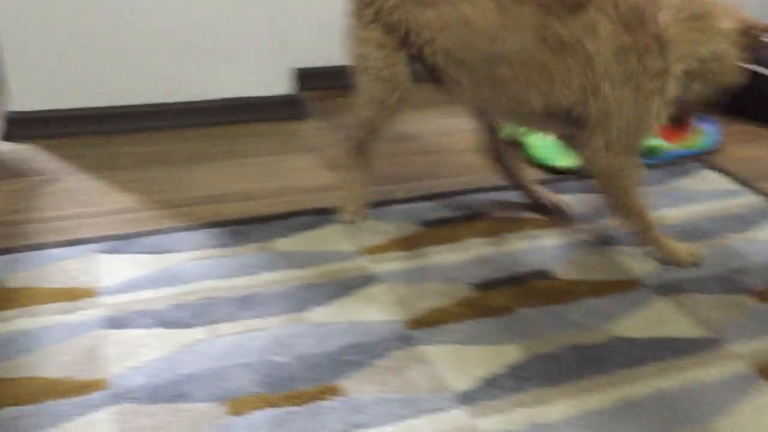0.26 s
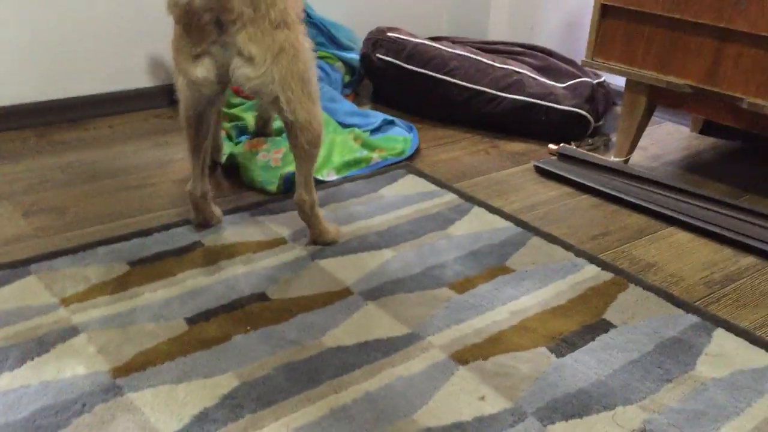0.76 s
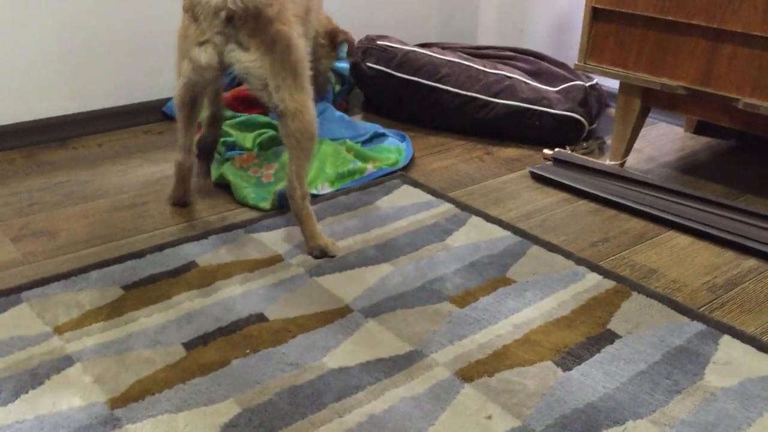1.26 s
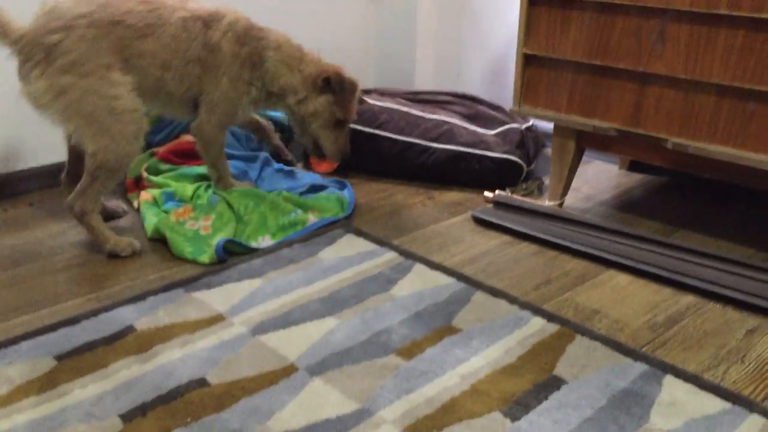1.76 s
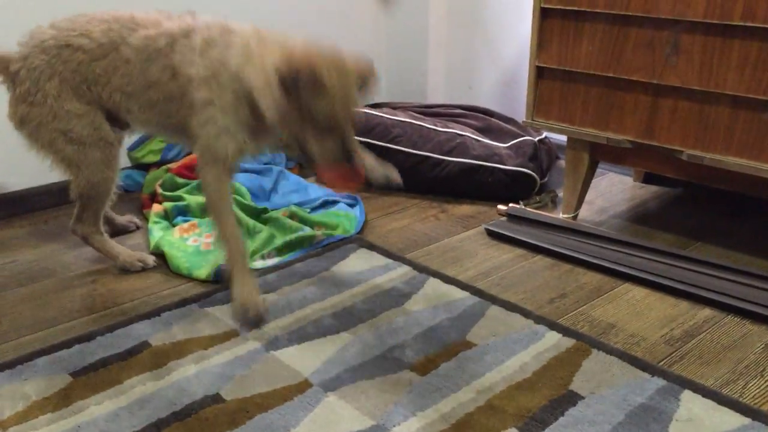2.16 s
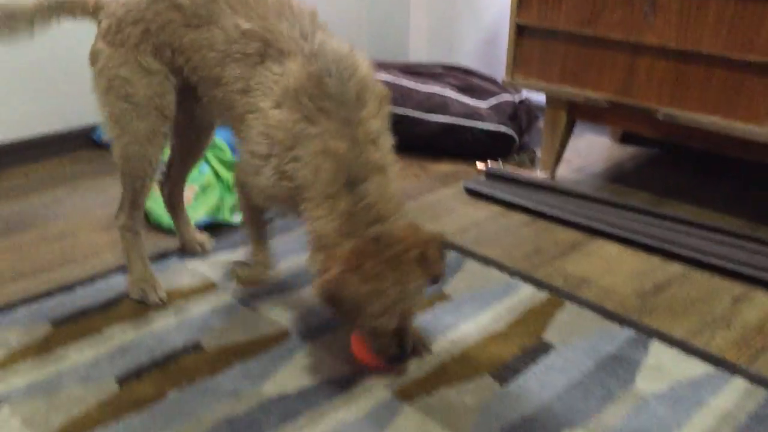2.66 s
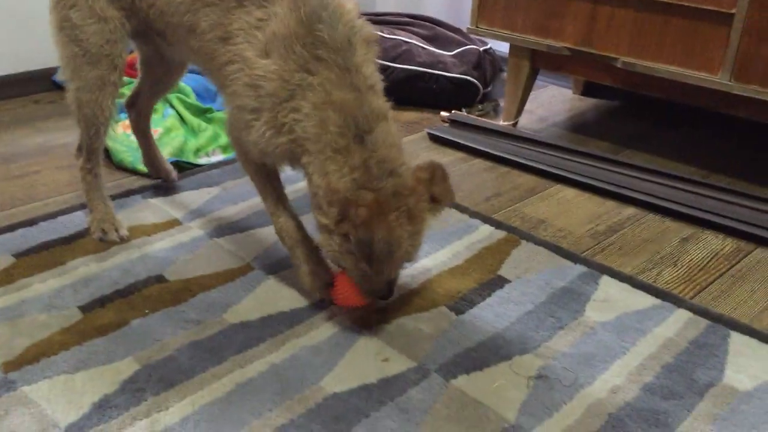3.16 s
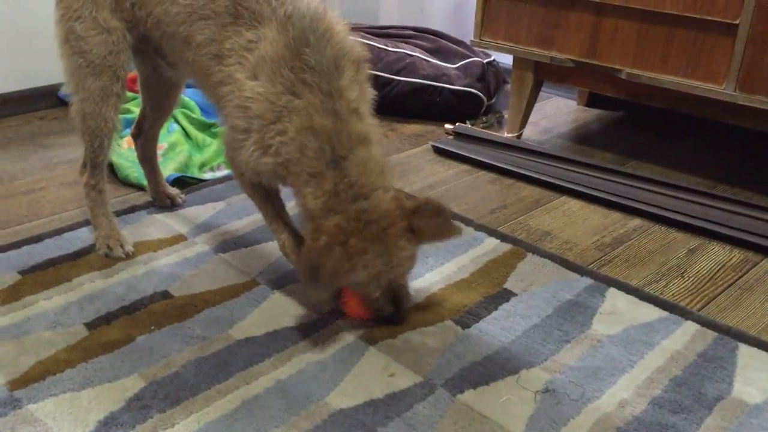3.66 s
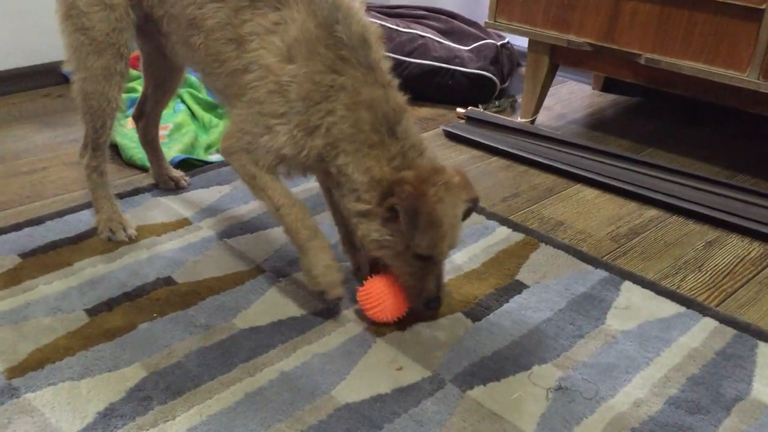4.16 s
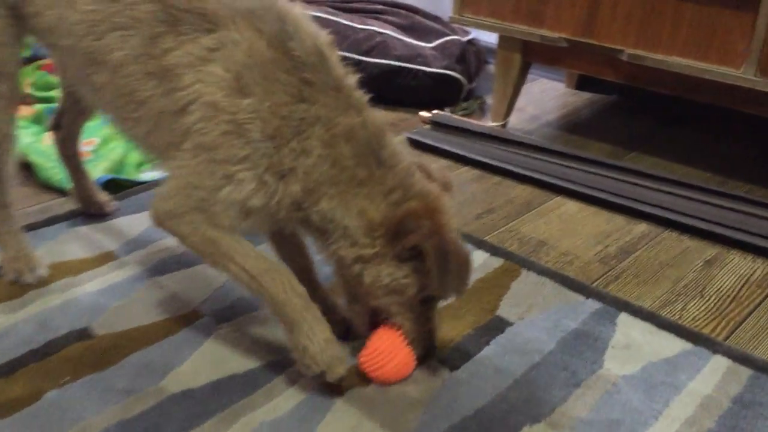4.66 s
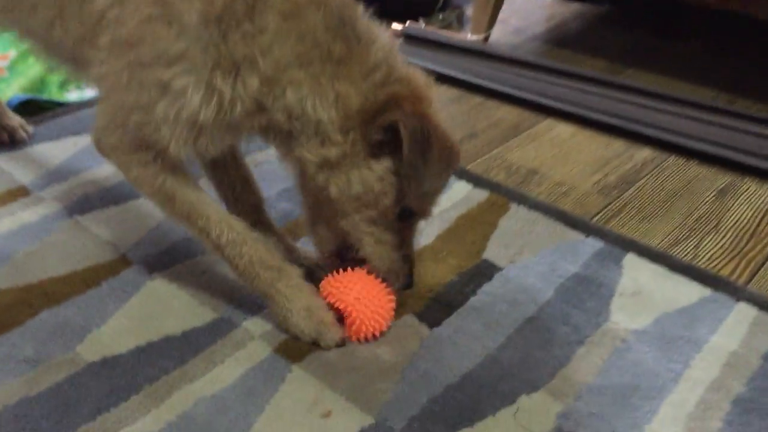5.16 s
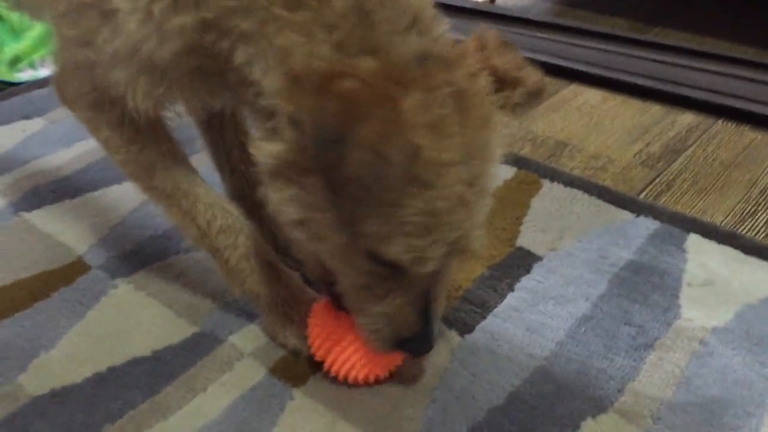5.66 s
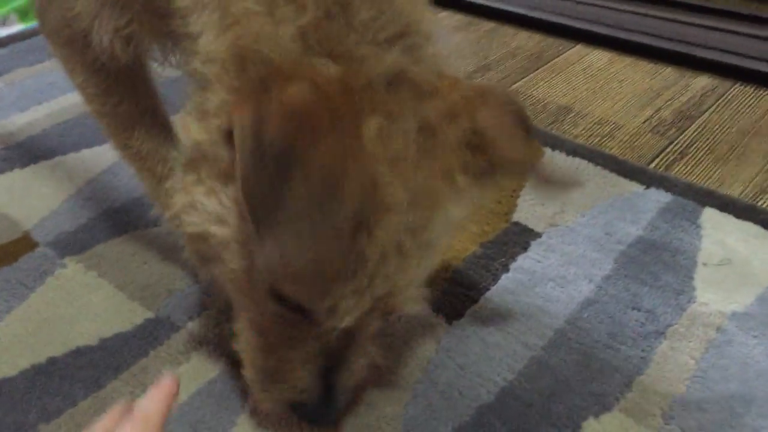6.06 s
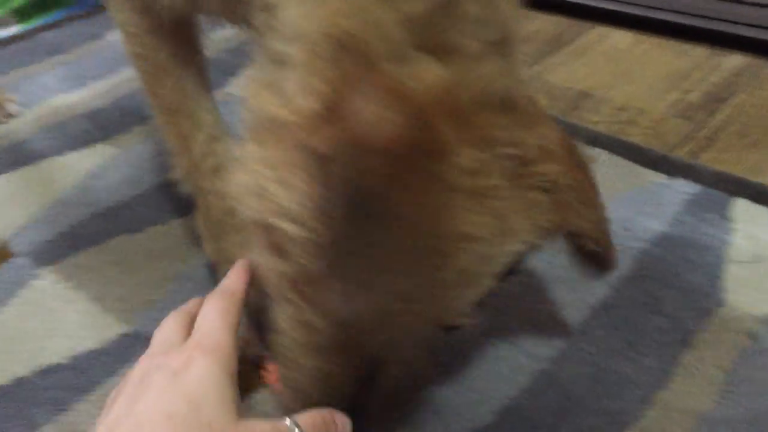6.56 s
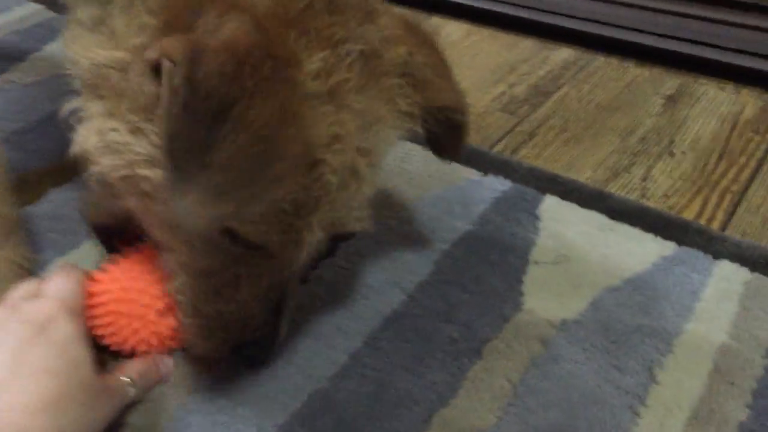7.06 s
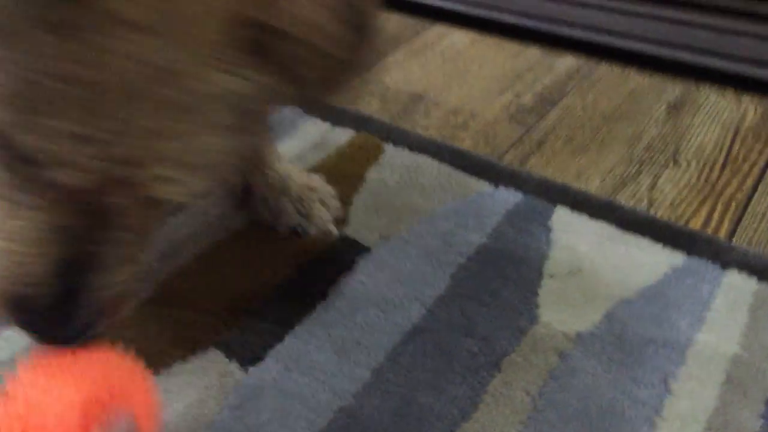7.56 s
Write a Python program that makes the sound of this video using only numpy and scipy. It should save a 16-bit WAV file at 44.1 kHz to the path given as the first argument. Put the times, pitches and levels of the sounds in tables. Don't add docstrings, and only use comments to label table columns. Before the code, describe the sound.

A spiky rubber dog toy squeaks in fast, irregular bursts, first across a ringing room, then close up, with paw thuds and soft sniffs.

```python
import sys
import numpy as np
from scipy import signal
from scipy.fft import rfft, irfft
from scipy.io import wavfile
from scipy.ndimage import uniform_filter1d

SR = 44100
rng = np.random.default_rng(int(sys.argv[2]) if len(sys.argv) > 2 else 0)


def invert_db(x):
    u = np.asarray(x, float) / 20
    return 10 ** u


def store_wav(level_fs):
    pcm = np.round(np.clip(np.atleast_2d(level_fs), -1, 1) * 32767)
    wavfile.write(sys.argv[1], SR, pcm.T.astype(np.int16))


N = 344862
LONGEST = SR // 4
TOP_HZ = 15700

# frequency in Hz, level in dB per Hz.
HUSH_SPECTRUM = [(60, -4), (200, -6), (450, -16), (800, -14), (2300, -18), (4000, -32), (6400, -22),
                 (8000, -28), (15500, -33)]
HUSH_DB = -67.3

# from Hz, to Hz, time to fade by 60 dB in seconds, level in dB.
WALL_BANDS = [(720, 1275, 0.63, -0.5), (1500, 3760, 0.65, -3), (3680, 5790, 0.55, 1.5),
              (7500, 9840, 0.42, 3.5), (10500, 15000, .3, -3.5)]
# time in seconds, room share in dB.
ROOM_SHARE = [(0, -6.5), (.8, -4), (1.1, -1.5), (1.6, -4.5), (3.4, -7), (4.4, -7), (4.8, -13), (6.1, -13),
              (7.0, -15), (7.7, -17)]

# start in seconds, length in seconds, low rub level in dB.
RUBS = [
    (0, 0.027, -66),
    (0.34, 0.044, -42),
    (0.775, 0.11, -37),
    (1.254, 0.06, -41),
    (1.855, 0.029, -42),
    (5.195, 0.035, -44),
    (6.415, 0.17, -36.5),
    (6.99, 0.043, -38.5),
    (7.456, 0.32, -45),
    (7.703, 0.18, -56),
]
RUB_FLOOR_DB = -70.5
# start in seconds, length in seconds, level in dB.
SCUFFS = [(1.843, 0.032, -78), (1.943, 0.18, -67.5), (2.703, 0.1, -58), (2.891, 0.12, -81),
          (3.27, 0.048, -80.5), (5.18, 0.048, -65.5), (5.421, 0.082, -75.5), (5.796, 0.018, -68.5),
          (5.862, 0.018, -83), (7.483, 0.19, -58), (7.545, 0.22, -60.5), (7.693, 0.11, -52)]

# start in seconds, level in dB, pitch in Hz.
THUDS = [(0.157, -35.5, 60), (0.382, -29, 67.9), (0.797, -34, 110), (1.236, -49, 114), (1.445, -54, 65),
         (1.858, -52.5, 129), (2.304, -35.5, 61), (2.654, -38.5, 52.3), (3.712, -45.5, 121),
         (4.95, -56, 55.8), (5.411, -50.5, 70.8), (5.8, -54, 112), (6.125, -41.5, 102),
         (6.595, -45.5, 66.3), (6.871, -44.5, 104.6), (7.018, -70, 70.0), (7.226, -70.5, 129.7),
         (7.327, -40, 56.4)]
# start in seconds, level in dB, pitch in Hz.
KNOCKS = [(0.156, -64, 165), (0.367, -38, 403), (0.723, -40.5, 187), (0.797, -29, 269), (1.026, -48.5, 195),
          (1.253, -40, 198.4), (4.287, -44, 269), (6.3, -51, 296), (.004, -41.5, 105), (1.869, -41, 172.4),
          (2.252, -47.5, 187.6), (3.078, -57, 322), (3.17, -48, 321.5), (3.271, -52, 329),
          (3.474, -48, 154), (3.763, -44, 210), (4.089, -45, 311), (4.397, -53, 296), (4.561, -42, 194),
          (4.973, -46.5, 269), (5.191, -40.5, 224), (5.213, -41.5, 260), (5.822, -50, 300),
          (2.29, -48.5, 324), (2.688, -52.5, 375), (2.752, -47.5, 344), (2.8, -54, 334.3),
          (7.757, -39, 400), (7.57, -47, 328), (5.402, -45, 307), (5.49, -50.5, 481), (5.576, -53, 430),
          (5.793, -41, 152), (5.859, -57, 313), (6.479, -42.5, 190), (6.617, -39, 173), (6.774, -47, 178),
          (7.036, -38, 169), (7.234, -40, 153), (7.359, -50, 187), (7.787, -34.5, 190)]
# start in seconds, level in dB,
# pitch in Hz.
TICKS = [(.213, -35.5, 3100), (.897, -36, 2980), (5.455, -51.5, 2464), (5.12, -58, 2520),
         (5.156, -54.5, 2400), (5.485, -47.5, 2536), (5.815, -48, 1950), (1.361, -38, 2530),
         (2.195, -48, 1400), (5.95, -69.5, 3190), (7.779, -46, 616), (1.867, -43, 2610),
         (2.982, -46.5, 2470), (3.173, -58, 814), (3.273, -45.5, 1077), (5.142, -50, 1940),
         (5.401, -49, 729), (5.493, -37.5, 867), (5.578, -44, 710), (5.666, -60, 2360), (5.829, -40, 853),
         (5.861, -49, 870), (5.977, -41, 2350), (7.235, -51.5, 783), (7.361, -40.5, 800),
         (7.554, -40, 1194)]

# start in seconds, length in seconds, level in dB, top band in dB, peak in Hz.
SNIFFS = [(1.353, 0.0228, -53, -7.5, 4930), (1.977, 0.051, -60.5, -15, 6620),
          (2.435, 0.041, -70, -13, 6320), (3.187, 0.12, -93, 14, 6900), (4.606, 0.09, -76, 22, 7500),
          (5.194, 0.029, -68.5, 2, 6240), (5.298, 0.034, -73.5, 1.5, 6320), (5.439, 0.053, -57, -13, 6400),
          (5.681, 0.1, -74, 3.5, 6600), (5.792, 0.0099, -66, -14, 6640), (5.864, 0.012, -69, -16, 6600),
          (5.971, 0.057, -67, -3, 6530), (7.043, 0.039, -49.5, -6.5, 6200), (7.1, 0.046, -63, -15, 5950),
          (7.239, 0.066, -54, 4, 6040), (7.358, 0.037, -51, -4, 5840), (7.456, 0.057, -51.5, -25.5, 6380),
          (7.535, 0.096, -65.5, -2, 6200), (7.704, 0.13, -67.5, -20, 5550)]

# frequency in Hz, level in dB.
BODY = [(700, 9), (1200, -4.5), (2000, -2), (3000, -5), (4000, -16.5), (5500, -31), (8000, -47.5)]
# frequency in Hz, level in dB.
WHISTLE = [(3500, -22.5), (4800, -12), (5800, -5), (6600, 2), (7600, -7), (8800, -13), (10000, -27)]
# frequency in Hz, level in dB.
TOP = [(8000, -15.5), (9500, -6), (10600, -3), (12000, -13), (14000, -9.5), (16000, -13.5)]

# start in seconds, length in seconds, peak pitch in Hz, closing pitch in Hz, level in dB.
FAR_BITES = [(0.128, 0.058, 790, 790, -55.5), (0.386, 0.065, 991, 920, -44),
             (0.501, 0.061, 976, 929, -37.5), (0.671, 0.074, 968, 999, -37), (0.929, 0.125, 1114, 986, -38),
             (1.149, 0.097, 1010, 983.5, -47.5), (1.247, 0.074, 992, 995, -47.5),
             (1.391, 0.027, 977, 973, -46), (1.613, 0.1, 1025, 971, -43.5), (2.118, 0.025, 889, 864, -41.5),
             (2.195, 0.075, 961, 940, -44.5), (2.412, 0.021, 869, 856, -51.5),
             (2.565, 0.14, 978, 893, -43.5), (3.037, 0.036, 808, 797, -59.5)]
# start in seconds, length in seconds, peak pitch in Hz, closing pitch in Hz, level in dB.
NEAR_BITES = [(3.375, .116, 1018, 961, -34.5), (3.486, .096, 1149, 1040, -30.5),
              (3.678, 0.078, 1015, 1023, -34), (4.013, 0.086, 1037, 951, -35),
              (4.208, .098, 1035, 1002, -32), (4.402, 0.14, 1018, 951, -33),
              (4.799, 0.16, 996, 977.4, -31.5), (6.443, .1, 972, 973, -34), (6.752, 0.12, 1043, 989, -26),
              (6.962, 0.078, 960, 910.5, -28.5), (7.248, 0.064, 876, 823, -55),
              (7.632, 0.074, 956, 894, -35), (6.55, 0.014, 1063, 1040, -25.5),
              (7.372, 0.024, 874, 863, -57), (7.619, 0.027, 815, 840, -50)]
# rise to peak pitch in seconds, starting pitch as a share of the peak,
# share of the hold spent sagging, let-go pitch as a share of the closing pitch, fade in dB per second.
FAR_GRIPS = [(0.021, .94, .9, 1, -100), (0.024, 0.94, 0.97, .9, -100), (0.012, 0.9, .9, .9, -100),
             (0.0053, 0.88, 1, .92, -100), (0.03, .93, .7, .92, -100), (.05, 0.96, .9, .97, -73.5),
             (0.0157, 0.94, 1, .92, -100), (0.021, 0.93, .9, .92, -100), (0.017, 0.92, .9, .96, -57),
             (.015, 0.94, 0.96, 0.92, -100), (0.014, .86, .9, .92, -64), (.007, .9, 1, .94, -100),
             (.01, .86, 0.9, .96, -68), (0.02, 1, .9, 0.92, -100)]
# rise to peak pitch in seconds, starting pitch as a share of the peak,
# share of the hold spent sagging, let-go pitch as a share of the closing pitch, fade in dB per second.
NEAR_GRIPS = [(.016, .94, .9, .84, -30), (.012, .9, 0.99, 0.85, -29), (.028, .85, .9, .82, -12),
              (0.0088, 0.88, 0.9, .85, -38), (0.027, 0.89, 1, .84, -30), (.016, 0.92, 0.9, .86, -40),
              (.015, 0.88, .25, .84, -8.5), (0.02, .93, .9, .82, 13), (0.024, 0.91, 0.7, 0.86, 0),
              (0.016, .88, 0.83, .9, -50), (.018, .93, 0.6, 0.96, -35), (.017, .88, 0.45, .92, -60),
              (0.0032, 0.9, .9, 0.97, -37), (0.009, 0.99, .9, .92, -37), (.012, .95, .9, 1, 100)]
# second harmonic in dB, higher body harmonics in dB, whistle in dB, top band in dB.
FAR_JAWS = [(7, -7, -20, -4), (9.5, 12.5, -3.5, -15.5), (0.5, 4, -17, -1.5), (3, 2.5, -13, -1),
            (4.5, -2.5, -3, 2), (7.5, 8, -10, 3.5), (5.5, -3, -5, -6), (6, -1, -4.5, -15), (6, -3, -7, -9),
            (7.5, 1.5, -5, -21), (9.5, 2, -2, -7.5), (13.5, 9, 1, -0.5), (5, -1.5, -1, -9),
            (-25, -29, -45.5, -12.5)]
# second harmonic in dB, higher body harmonics in dB, whistle in dB, top band in dB.
NEAR_JAWS = [(5.5, -5, -20.5, -6), (3, -5, -13, -23), (3, -6, -22.5, -2.5), (6.5, -6, -22, -8),
             (4.5, -6.5, -25, 12), (3.5, -9, -11.5, -4), (3.5, -7.5, -31, 14), (5, -2, -3.5, -9),
             (-4, 0, -14, -11.5), (-11.5, -5, -11.5, -8), (-13, -11, -36, -10.5), (12.5, 2, -4.5, -5.5),
             (8, -3, -5, -11), (-9, -20, -40.5, -10), (-16, -16, -38, -10)]
ATTACK_S, LET_GO_S = 0.008, 0.027
ATTACK_DB, LET_GO_DB, WHISTLE_FADE_DB = -12.5, -13, -0.5

# time in seconds, reed pitch in Hz, level in dB.
FAR_SQUEALS = [
    [(0, 1604, -31.5), (.01, 1517, -21), (.016, 1466, -21.5), (.024, 1241, -24.5), (.04, 1083, -38),
     (.05, 1030, -55.5), (0.07, 970, -59)],
    [(0.218, 1170, -30), (0.228, 1238, -19), (.246, 1218, -26), (0.256, 1193, -27.5), (.272, 1076, -32),
     (0.294, 1022, -36.5), (0.318, 985, -41.5), (0.33, 970, -61)],
    [(0.762, 940, -18), (0.773, 1193, -26), (0.8, 1366, -26), (0.824, 2750, -16), (0.846, 3930, -20.5),
     (0.888, 4144, -22), (0.899, 2913, -11), (0.91, 1597, -28.5), (0.928, 910, -41)],
]
# time in seconds, reed pitch in Hz, level in dB.
NEAR_SQUEALS = [
    [(3.773, 1003, -29.5), (3.786, 1180, -27), (3.804, 1377, -22), (3.822, 1215, -25), (3.854, 1076, -30.5),
     (3.952, 1011, -33.5), (3.972, 850, -38.5)],
    [(4.639, 1057, -31.5), (4.65, 1107, -27), (4.669, 1130, -29.5), (4.69, 1087, -28.5), (4.709, 1123, -28),
     (4.738, 1028, -30), (4.76, 870, -41)],
    [(5.998, 794, -53), (6.018, 830, -47), (6.034, 917, -35), (6.068, 953, -31), (6.098, 947, -32),
     (6.122, 852, -38.5), (6.135, 808, -41.5)],
    [(6.156, 1097, -30), (6.166, 1188, -19), (6.184, 1597, -19), (6.193, 1581, -19), (6.207, 1630, -19),
     (6.226, 1406, -21.5), (6.248, 1266, -24.5), (6.268, 1088, -30), (6.336, 981, -38.5)],
    [(6.552, 1080, -26.5), (6.564, 1290, -20.5), (6.574, 1500, -20.5), (6.584, 1540, -18.5),
     (6.602, 1553, -21.5), (6.609, 1850, -17), (6.621, 2585, -15.5), (6.63, 1920, -23), (6.638, 1700, -44)],
]
# second harmonic in dB, higher body harmonics in dB,
# whistle at the start in dB, whistle at the end in dB, top band in dB.
SQUEAL_JAWS = [(5.5, 9, -2.5, -3, -26.5), (0, 8, -6, -3.5, -5.5), (5.5, 3, -7, -11.5, -8.5),
               (1, -4.5, -11.5, -14, -32), (3, -6, -12.5, -19.5, 6.5), (4.5, -14, -3.5, -6.5, -11.5),
               (-12.5, -9, 4.5, 7, -17), (-3.5, -4.5, 1.5, -8.5, -57)]
# change around 4.6 kHz
# in dB, change around 9 kHz in dB.
MUFFLES = [(1.5, -9), (-10.5, 3), (-10.5, 0.5), (3, 7.5), (-9, -6), (5, 7), (-8, -5), (-4, 6.5), (2, 3.5),
           (-11, 4), (-7, 5), (-22, -8), (-3, -0.5), (-5, 4), (-3, -1), (1.5, -5), (-2.5, -5), (-2.5, 1),
           (-6.5, 2.5), (-13, 6), (-6.5, 1), (-7, -1.5), (-8, 0.5), (-7, 2.5), (-7.5, -3), (6, 3.5),
           (10, 12), (-3, -3), (0, 0), (-3.5, -8), (-1.5, -4), (4, -1), (-2, -6), (-3.5, -10.5), (-1.5, -2),
           (-6, -7.5), (-0.5, -8.5)]


def contour(points, hz):
    f, db = np.transpose(points)
    return np.interp(np.log(hz), np.log(f), db)


def band(x, lo_hz, hi_hz, order=2):
    sos = signal.butter(order, [lo_hz, min(hi_hz, .45 * SR)], "band", fs=SR, output="sos")
    y = signal.sosfilt(sos, x)
    return y / np.sqrt(np.mean(y ** 2))


def walk(rate, size=N):
    k = int(SR / rate)
    steps = np.repeat(rng.standard_normal(size // k + 1), k)
    return 1.3 * uniform_filter1d(uniform_filter1d(steps, k), k)[:size]


def add(out, s, sound):
    i = int(s * SR)
    out[i:i + len(sound)] += sound[:N - i]


def puff(length, edge_s):
    t = np.arange(LONGEST) / SR
    trail = invert_db(-60 * np.maximum(t - length + edge_s, 0) / (9 * edge_s))
    return np.minimum(t / edge_s, 1) ** 2 * trail


def hush():
    hz = np.maximum(np.arange(N // 2 + 1) * SR / N, 15)
    air = irfft(rfft(rng.standard_normal(N)) * invert_db(contour(HUSH_SPECTRUM, hz)), N)
    return invert_db(HUSH_DB + 1.1 * walk(5)) * air / np.std(air)


def echoes():
    t = np.arange(SR * 2 // 3) / SR
    tail = np.zeros(len(t))
    for lo, hi, t60, db in WALL_BANDS:
        noise = band(rng.standard_normal(len(t)), lo, hi)
        tail += invert_db(db - 60 * t / t60) * np.sqrt(hi - lo) * noise
    tail = tail * (1 + 2.0 * invert_db(-60 * t / 0.15))
    return tail * np.clip((t - .003) / 0.0091, 0, 1) / 5000


def rug():
    grains = rng.standard_normal(N) * invert_db(4.0 * rng.exponential(size=N))
    rub = np.full(N, invert_db(RUB_FLOOR_DB))
    for s, length, db in RUBS:
        add(rub, s, invert_db(db) * puff(length, edge_s=0.023))
    out = rub * invert_db(-17.5 + 2.0 * walk(25.0)) * band(grains, 150, 370)
    for s, length, db in SCUFFS:
        grain_db = 0.34 * rng.exponential(size=LONGEST) + 1.4 * walk(57.0, size=LONGEST)
        fibres = rng.standard_normal(LONGEST) * invert_db(grain_db)
        add(out, s, invert_db(db) * puff(length, edge_s=.22 * length) * band(fibres, 1000, 2600))
    return out


def blows(events, rise_s, t60, rough):
    out, t = np.zeros(N), np.arange(SR // 2) / SR
    for s, db, hz in events:
        rattle = band(rng.standard_normal(len(t)), 0.077 * hz, 2.11 * hz)
        ring = np.sin(2 * np.pi * hz * t) + rough * rattle
        add(out, s, invert_db(db - 60 * t / t60) * (1 - np.exp(-t / rise_s)) * ring)
    return out


def ticks():
    out, t = np.zeros(N), np.arange(4000) / SR
    for s, db, hz in TICKS:
        crack = 0.2 * invert_db(-60 * t / 0.006) * band(rng.standard_normal(len(t)), 500, 6000)
        scuff = 0.37 * invert_db(-60 * t / 0.052) * band(rng.standard_normal(len(t)), 310, 1.35 * hz)
        ring = invert_db(-60 * t / .016) * np.sin(2 * np.pi * hz * t)
        add(out, s, invert_db(db) * np.minimum(t * 1000, 1) * (crack + scuff + ring))
    return out


def nose():
    out = np.zeros(N)
    for s, length, db, top_db, hz in SNIFFS:
        air = rng.standard_normal((3, LONGEST))
        peak = invert_db(3.9 * walk(106, size=LONGEST)) * band(air[0], 0.902 * hz, 1.16 * hz, order=3)
        fine = band(air[1], 8740, 10400) + .5 * band(air[1], 12000, 13000)
        top = invert_db(top_db + 1.1 * walk(79, size=LONGEST)) * fine
        wide = invert_db(-9.0) * band(air[2], 3800, 10000)
        add(out, s, invert_db(db) * puff(length, edge_s=0.0048) * (peak + top + wide))
    return out


def bite(row, grip):
    s, length, peak_hz, end_hz, db = row
    rise_s, start, sag, let_go, fade_db = grip
    rise_s = min(rise_s, 0.95 * length)
    hold_s = length - min(LET_GO_S, length / 3)
    attack_s = min(ATTACK_S, rise_s / 2)
    sagged_s = rise_s + np.clip(sag, .05, .98) * (hold_s - rise_s)
    end_db = db + fade_db * length
    return [(s, start * peak_hz, db + ATTACK_DB),
            (s + attack_s, peak_hz * (1 + start) / 2, db),
            (s + rise_s, peak_hz, db),
            (s + sagged_s, end_hz, db + fade_db * sagged_s),
            (s + hold_s, end_hz, db + fade_db * hold_s),
            (s + (length + hold_s) / 2, (2 + let_go) / 3 * end_hz, end_db + LET_GO_DB / 3),
            (s + length, let_go * end_hz, end_db + LET_GO_DB)]


def bites():
    plain = [bite(row, grip) for row, grip in zip(FAR_BITES + NEAR_BITES, FAR_GRIPS + NEAR_GRIPS)]
    jaws = [(second, higher, whistle, whistle + WHISTLE_FADE_DB, top)
            for second, higher, whistle, top in FAR_JAWS + NEAR_JAWS]
    colours = [jaw + muffle for jaw, muffle in zip(jaws + SQUEAL_JAWS, MUFFLES)]
    return zip(plain + FAR_SQUEALS + NEAR_SQUEALS, colours)


def squeak(rows, second_db, third_db, whistle_from_db, whistle_to_db, top_db, mid_db, high_db):
    s, hz, db = np.transpose(rows)
    t = np.arange(LONGEST) / SR
    length = s[-1] - s[0]
    sounding = s[0] <= 0
    db[0], db[-1] = min(db[0], db[1]), min(db[-1], db[-2])
    hz = uniform_filter1d(np.interp(t + s[0], s, hz), 180)
    hz = hz * (1 + 0.0029 * walk(57.7, size=LONGEST))
    hz = hz * (1 + .0022 * (hz / 1000) ** 1.7 * walk(300, size=LONGEST))
    k = np.arange(1, 20)[:, None]
    harmonic_hz = k * hz

    slapping = np.clip(np.minimum(t / .016, (length + .002 - t) / .014), 0, 1)
    whistle = invert_db(np.interp(t, [0, length], [whistle_from_db, whistle_to_db])) * slapping
    share = invert_db(contour(BODY, harmonic_hz) + second_db * (k == 2) + third_db * (k > 2))
    share = share * invert_db(-9 * np.clip(hz / 1500 - 1, 0, 1) * (k > 1))
    share = share + whistle * (invert_db(contour(WHISTLE, harmonic_hz)) + invert_db(contour(TOP, harmonic_hz) + top_db))
    mid = mid_db * np.exp(-(np.log(harmonic_hz / 4600) / 0.31) ** 2)
    high = high_db * np.exp(-(np.log(harmonic_hz / 9000) / 0.22) ** 2)
    share = share * invert_db(mid + high)
    overtones = np.clip(np.minimum(t / .007 + sounding, (length + .003 - t) / .014), .1, 1)
    share = share * np.where(k > 1, overtones, 1)
    wander = np.array([walk(42, size=LONGEST) for _ in k])
    shade = invert_db(wander * (1.0 + 1.9 * np.log(k)))

    waves = np.sin(k * np.cumsum(2 * np.pi * hz / SR) + 1.0 * k)
    tone = np.sum(share * shade * (harmonic_hz < TOP_HZ) * waves, axis=0)
    leak = invert_db(-40) * np.minimum(hz / 1000, 1.7) ** 2.2
    hiss = leak * band(rng.standard_normal(LONGEST), 1500, 15000)
    fade = np.clip(np.minimum(t / .012 + sounding, (length + .006 - t) / .016), 0, 1) ** 2
    return invert_db(np.interp(t + s[0], s, db)) * fade * (tone + hiss)


def ball():
    out = np.zeros(N)
    add(out, 0, invert_db(-3.0) * echoes()[600:])
    there = echoes()
    for rows, colour in bites():
        start_s = rows[0][0]
        room_db = np.interp(start_s, *np.transpose(ROOM_SHARE))
        sound = squeak(rows, *colour)
        add(out, start_s, sound)
        spots = np.array([there, echoes()])
        there = spots[1]
        tails = signal.fftconvolve(sound[None], spots, axes=1)
        turn = 1.4 * walk(12, size=tails.shape[1])
        add(out, start_s, invert_db(room_db) * (np.cos(turn) * tails[0] + np.sin(turn) * tails[1]))
    return out


def scene():
    knocks = blows(KNOCKS, rise_s=0.0059, t60=0.095, rough=0.77)
    thuds = blows(THUDS, rise_s=0.025, t60=0.21, rough=0.64)
    small = nose() + rug() + ticks() + knocks + thuds
    small_in_room = invert_db(-18.5) * signal.fftconvolve(small, echoes())[:N]
    return (ball() + small + small_in_room + hush())[None]


def top_cut(x):
    return signal.sosfilt(signal.butter(12, 15760, fs=SR, output="sos"), x)


def record(dry):
    dry = signal.sosfilt(signal.butter(5, 42, "high", fs=SR, output="sos"), dry)
    dry = signal.lfilter(*signal.iirnotch(10500, 9, fs=SR), dry) * 0.82 + dry * 0.52
    dry = .55 * np.tanh(dry / .55)
    dry = signal.sosfilt(signal.ellip(8, .2, 70, TOP_HZ - 40, fs=SR, output="sos"), dry)
    return top_cut(dry)


dry = scene()
out = record(dry)
store_wav(out)
```